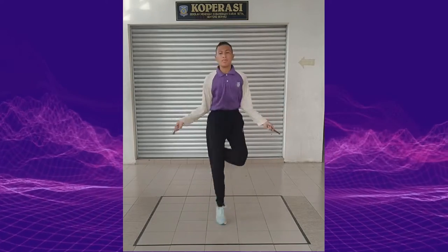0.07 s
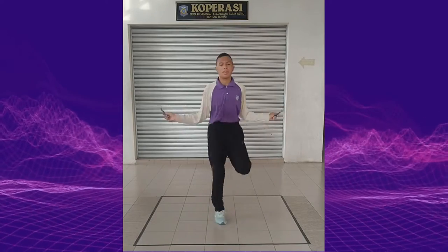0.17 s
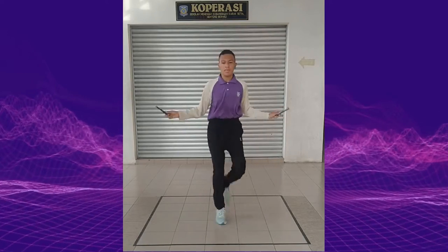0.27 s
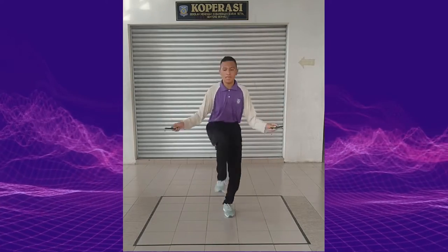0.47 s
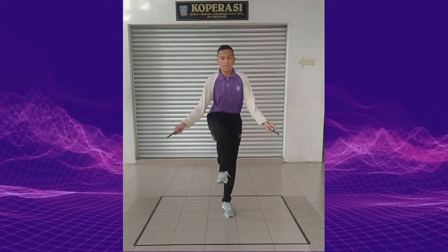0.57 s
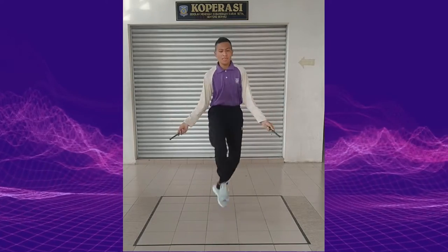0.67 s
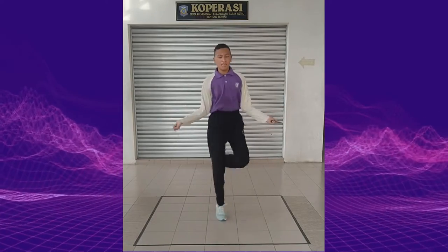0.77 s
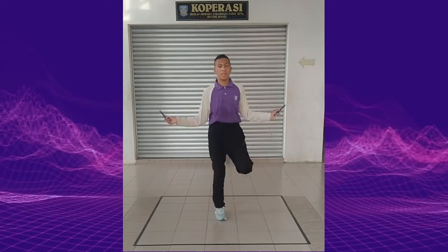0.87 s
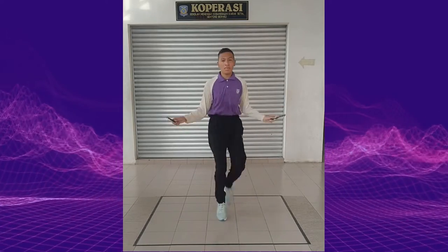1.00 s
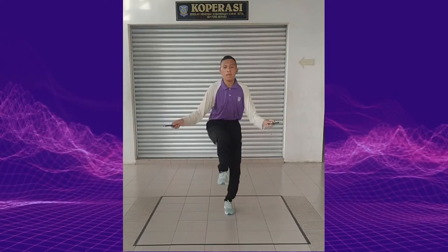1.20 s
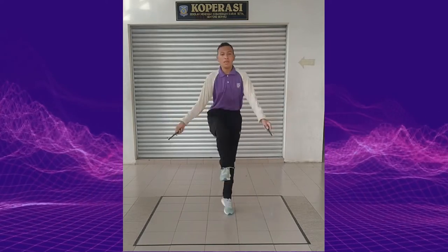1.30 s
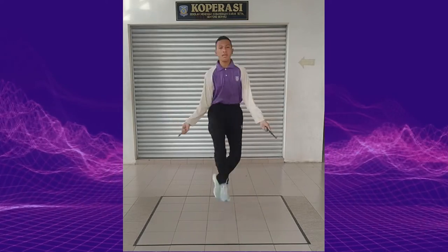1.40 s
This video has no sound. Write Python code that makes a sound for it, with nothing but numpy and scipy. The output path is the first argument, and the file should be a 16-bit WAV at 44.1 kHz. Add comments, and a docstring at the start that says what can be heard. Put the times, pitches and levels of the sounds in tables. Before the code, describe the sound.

Someone skips rope on a tiled floor in an echoing porch. The cord ticks against the tiles, then one shoe slaps down and the other follows with a low thud. One microphone hears it over a faint hum.

```python
"""Someone skips rope on a tiled floor, in a hard, echoing porch with a metal roller shutter.
Each turn the rope ticks and skids over the tiles, then one shoe slaps down and the other after it,
with a low thud of body weight. One microphone hears every contact dry, then thrown back by the
shutter some 20 ms later, then in the long tail of the porch, over a steady wash and a low hum."""
import sys
import numpy as np
from scipy import signal
from scipy.fft import rfft, irfft
from scipy.io import wavfile

SR = 44100
rng = np.random.default_rng(int(sys.argv[2]) if len(sys.argv) > 2 else 0)


def unload_audio(sound):
    """Save the sound as a 16-bit wav file, at the path given as the first command line argument."""
    columns = np.transpose(np.atleast_2d(sound))
    # keep every value between -1 and 1, then stretch to whole-number steps
    steps = np.round(np.clip(columns, -1, 1) * 32767)
    wavfile.write(sys.argv[1], SR, steps.astype(np.int16))


N = 63945
HZ = np.fft.rfftfreq(8192, 1 / SR)
LEAD_S = .003  # run-up before each click


def amp(db):
    """Decibels to gain."""
    return 10 ** (np.asarray(db) / 20)


def unit_rms(x):
    """Scales to rms 1."""
    return x / np.sqrt(np.mean(x ** 2) + 1e-20)


def curve(points, hz, column=1):
    """Reads one column of a table along log frequency."""
    table = np.transpose(points)
    return np.interp(np.log(hz + 1), np.log(table[0]), table[column])


def add(mix, start_s, sound):
    """Mixes a sound in at start_s."""
    part = mix[max(round(start_s * SR), 0):][:len(sound)]
    part += sound[:len(part)]


def resonance(hz, centre_hz, width_hz):
    """Gain of a resonance, 1 at its centre."""
    return 1 / (1 + ((hz - centre_hz) / width_hz) ** 2)


def click(gain, sharpness=1, spread_s=0):
    """A pulse with this spectrum, LEAD_S in; sharpness 1 starts at once, 0 swells as it fades."""
    log_gain = np.log(np.maximum(gain, 1e-5))
    mirrored = np.concatenate([log_gain, log_gain[-2:0:-1]])
    minimum_phase = -signal.hilbert(mirrored).imag[:len(HZ)]
    delay_s = LEAD_S + spread_s * np.log2(1 + (HZ / CRACK_HZ) ** 2) / 2  # spread holds back the treble
    lag = 2 * np.pi * HZ[1] * (np.cumsum(delay_s) - delay_s[0])
    return irfft(gain * np.exp(1j * (sharpness * minimum_phase - lag)))[:len(HZ) // 2]


# The porch's air, all around the microphone. Each row: frequency in Hz, relative level in dB.
AIR_SPECTRUM = [(25, -27), (45, -43), (80, -14), (115, -15), (145, -2), (185, -7.5), (300, -13), (550, -16),
                (1100, -12.5), (1450, -13.5), (1700, 1), (2000, -15), (3300, -20), (4200, -33), (5000, -29),
                (6500, -38), (8200, -49), (12000, -43.5), (16000, -53)]
def background():
    """The steady wash of the porch and a low wavering hum."""
    hz = np.fft.rfftfreq(N, 1 / SR)
    air = irfft(rfft(rng.standard_normal(N)) * amp(curve(AIR_SPECTRUM, hz)), N)
    hum = irfft(rfft(rng.standard_normal(N)) * resonance(hz, centre_hz=145, width_hz=2.5), N)
    return amp(-44.5) * unit_rms(air) + amp(-54) * unit_rms(hum)


GAP_S = .0185  # from a contact until the porch answers
# The porch's reverberation. Each row: frequency in Hz, level in dB, seconds to fall 60 dB.
PORCH_BANDS = [(59.72, -4.5, 3.2), (146, 16, 0.86), (232, 11, 0.55), (430, 8, 0.44), (862, 14, 0.46),
               (1176, 5.5, 0.77), (1836, 2, 0.71), (2540, 12, 0.87), (3150, 7, 0.57), (6000, 5.5, 0.57),
               (9160, 15, 0.53), (15600, -1.5, .42)]
def porch_tail():
    """Hard surfaces scatter a diffuse tail, each band dying at its own rate."""
    t = np.arange(N) / SR
    hz, age_s, noise = signal.stft(rng.standard_normal(N), SR, nperseg=512)
    t60 = np.maximum(curve(PORCH_BANDS, hz, column=2), .05)[:, None]
    decay_rate = np.log(1000) / t60
    gain = amp(curve(PORCH_BANDS, hz))[:, None] * np.sqrt(2 * decay_rate / SR)
    tail = signal.istft(noise * gain * np.exp(-decay_rate * age_s), SR, nperseg=512)[1][:N]
    opening_db = np.where(t < GAP_S, -9, 2 * np.exp(-(t - GAP_S) / .014))  # low, then a brief lift
    return tail * amp(opening_db)


# Tones that linger at this spot in the porch. Each entry: pitch in Hz.
PORCH_TONES_HZ = [232, 342, 607, 742, 846, 1605, 1729, 2343, 2560]
# Their ringing, in the same order. Each row: level in dB, seconds to fall 60 dB.
PORCH_TONE_DECAYS = [(-49, 0.65), (-48.5, .6), (-48, 0.35), (-47, 0.47), (-51, .5), (-53, 0.66),
                     (-51, 0.53), (-49.5, 0.66), (-54, 0.28)]
def porch_ring():
    """Faint ringing tones in the porch after each contact."""
    t = np.arange(N) / SR
    ring = np.zeros(N)
    for hz, (db, t60) in zip(PORCH_TONES_HZ, PORCH_TONE_DECAYS):
        add(ring, GAP_S, amp(db) * np.exp(-np.log(1000) * t / t60) * np.sin(2 * np.pi * hz * t))
    return ring


# Shutter and walls, a few metres off. Each row: delay in seconds, relative level in dB.
REFLECTIONS = [(0.02, -6), (0.0183, -8), (0.0246, -9), (0.0247, -3.5), (.0270, -5.5), (0.033, -12),
               (.0470, -15), (0.0665, -15.5)]
def echoes():
    """Distinct echoes come back dulled, with one band favoured by the ribbed shutter."""
    dulled = .5 / np.hypot(1, HZ / 4500)
    ribs = amp(-1.5) * resonance(HZ, centre_hz=1690, width_hz=170)
    echo = click(dulled + ribs)
    returns = np.zeros(N)
    for delay_s, db in REFLECTIONS:
        add(returns, delay_s - LEAD_S, amp(db) * echo)
    return returns


def porch(sound, tail_db, echo_db):
    """A contact at the microphone: direct sound, echoes, and the tail with its faint tones."""
    response = amp(tail_db) * (porch_tail() + porch_ring()) + amp(echo_db) * echoes()
    heard = signal.fftconvolve(sound, response)[:N]
    add(heard, 0, sound)
    return heard


# Cord on tile. Each row: frequency in Hz, relative level in dB.
CORD_SPECTRUM = [(30, -56), (200, 0), (900, -8.5), (1700, 9.5), (2500, -6), (3400, 5), (4500, -11.5),
                 (6000, 0.5), (7600, -6), (8600, -11.5), (10500, -5.5), (13000, -1.5), (16000, -7)]
# The rope's touches on the floor. Each row: start in seconds, then level, tail and echo in dB.
ROPE_TOUCHES = [(0.1171, -11.5, -0.5, -2), (0.1191, -19.5, -14, -7), (0.149, -26, 4, -8),
                (0.8069, -10.5, -8, -10), (0.8088, -17.5, -3, -11), (0.839, -35, -2, -8),
                (1.4204, -17, -10, -10)]
def rope(db, skid_s=.0027):
    """The cord ticks on the tile and skids for a moment."""
    t = np.arange(0, .008, 1 / SR)
    skid = rng.standard_normal(len(t)) * np.exp(-t / skid_s)
    skid *= amp(-7.5) / np.linalg.norm(skid)
    skid[0] += .7  # the tick
    return amp(db) * signal.fftconvolve(skid, click(amp(curve(CORD_SPECTRUM, HZ))))


# Body weight arriving on the floor. Each row: start in seconds, level in dB, pitch in Hz.
WEIGHT_THUDS = [(.256, -32, 148), (.455, -25.5, 135), (.842, -39.5, 166), (.978, -33.5, 224),
                (1.187, -30.5, 134)]
def thud(db, hz, rise_s=.0051):
    """A few low cycles as the weight comes down."""
    t = np.arange(0, .1, 1 / SR)
    push = t / rise_s * np.exp(1 - t / rise_s) * np.sin(2 * np.pi * hz * t)
    low_cut = signal.butter(3, 99, "high", fs=SR, output="sos")
    return amp(db) * signal.sosfilt(low_cut, push)


KNOCK_HZ, CRACK_HZ, SOLE_TOP_HZ, GRIT_HZ = 579, 2638, 7300, 8930
# A rubber sole on tile. Each row: frequency in Hz, relative level in dB.
SOLE_SPECTRUM = [(30, -75), (70, -27), (130, -21.5), (250, -16.5), (500, -21.5), (800, -20), (1150, -23.5),
                 (2450, -23.5), (3200, -14.5), (4300, -31), (5900, -27.5), (6900, -34.5), (8200, -48.5)]
# Shoes landing in front of the shutter. Each row: start in seconds, level in dB, trims for dull knock,
# bright crack and grit in dB, slap pitch and width in Hz, tail and echo in dB.
SOLE_CONTACTS = [(.2123, 20, 6, 2.5, -3.5, 1740, 259, -0.5, 3),
                 (.2572, 10.5, 11.5, 7, -14, 1590, 406, -0.5, -0.5),
                 (.4490, 21, 1.5, -0.5, -17, 1770, 446, 1, 1),
                 (0.4516, 18.5, 5.5, -4.5, -21, 1750, 370, -2.5, 1),
                 (0.4548, 22, -16.5, -13, -10.5, 1660, 288, 0, -1),
                 (0.8419, 2, 16.5, -11, -1, 1500, 397, -18, -10),
                 (0.9027, 23, -3, 3.5, -7, 1764, 364, 1, -18),
                 (0.958, 12.5, 20, 12.5, -12, 1530, 484, -5.5, -1),
                 (1.1558, 9, 8, -6, -4, 1650, 340, -7, -8),
                 (1.1783, 12, -21, -5.5, -9, 1690, 350, 2.5, 5.5),
                 (1.1805, 19, -4, -2, -14, 1688, 250, 1.5, 3),
                 (1.1850, 10.5, -7, -19, -8, 1650, 297, 0, -7)]
def shoe(db, knock_db, crack_db, grit_db, slap_hz, width_hz, grit_s=.011):
    """A sole meets the tile: air pops hollowly under it over a knock and a crack, then dust crunches."""
    knock = np.exp(-np.log2((HZ + 1) / KNOCK_HZ) ** 2)
    crack, top, grit_band = (1 / (1 + (hz / (HZ + 1)) ** 10) for hz in (CRACK_HZ, SOLE_TOP_HZ, GRIT_HZ))
    blow = amp(curve(SOLE_SPECTRUM, HZ) + knock_db * knock + crack_db * crack)
    blow *= 1 - top  # rubber dulls the blow
    slap = amp(-2.5) * resonance(HZ, slap_hz, width_hz) ** 2
    hit = click(blow + slap, sharpness=.68, spread_s=.000583)  # rubber lands gradually, the treble last
    dust = rng.standard_normal(len(hit)) * np.exp(-np.arange(len(hit)) / SR / grit_s)
    grain = click(grit_band / np.hypot(1, (HZ / 12500) ** 3))
    grit = signal.fftconvolve(dust / np.linalg.norm(dust), grain)[:len(hit)]
    return amp(db) * (hit + amp(grit_db - 38) * grit)


def scene():
    """Shoes and rope, heard from one spot in the porch."""
    mix = background()
    for start_s, *contact, tail_db, echo_db in SOLE_CONTACTS:
        add(mix, start_s - LEAD_S, porch(shoe(*contact), tail_db, echo_db))
    for start_s, db, hz in WEIGHT_THUDS:
        add(mix, start_s, porch(thud(db, hz), tail_db=-15, echo_db=-15))
    for start_s, db, tail_db, echo_db in ROPE_TOUCHES:
        add(mix, start_s - LEAD_S, porch(rope(db), tail_db, echo_db))
    return mix[None]


def record(dry):
    """The mono recorder passes nothing much above 16 kHz."""
    band_limit = signal.firwin(511, 16000, window=("kaiser", 9), fs=SR)
    return signal.oaconvolve(dry, band_limit[None], "same")


dry = scene()
out = record(dry)
unload_audio(out)
```